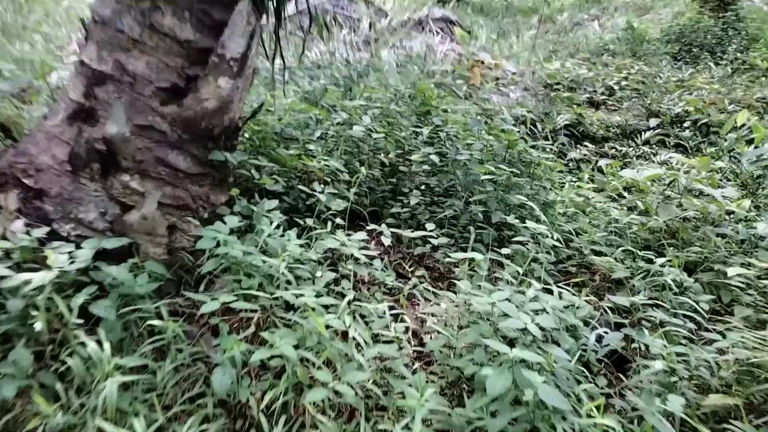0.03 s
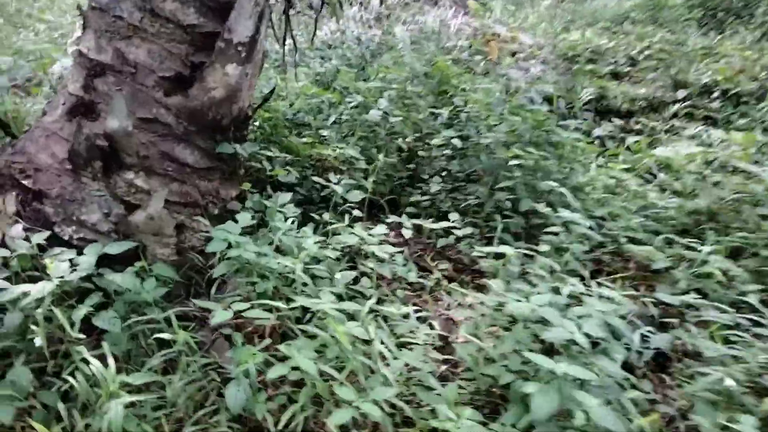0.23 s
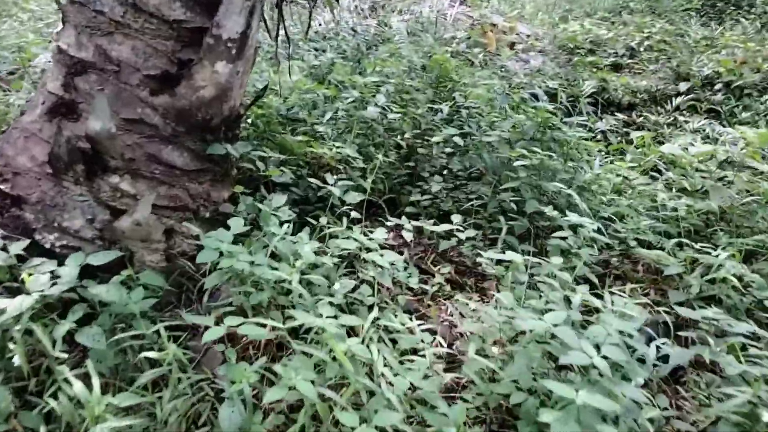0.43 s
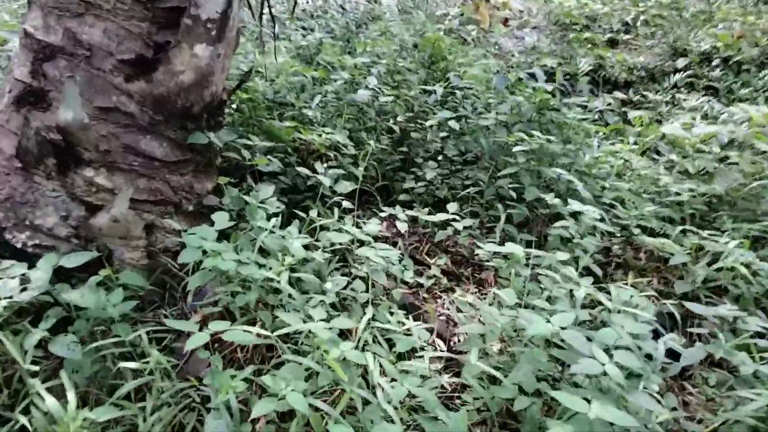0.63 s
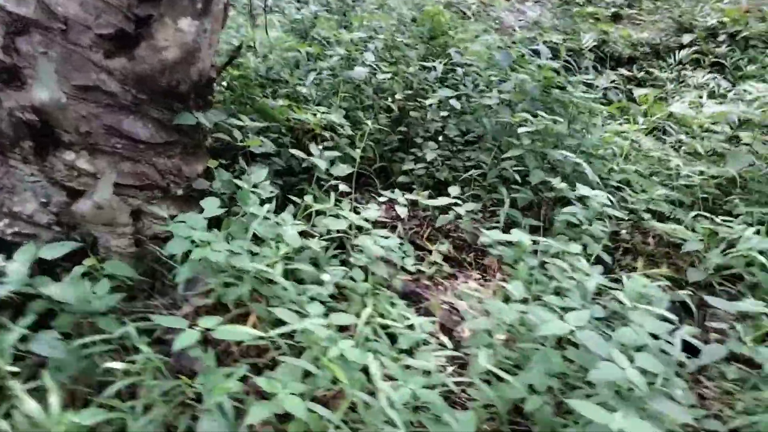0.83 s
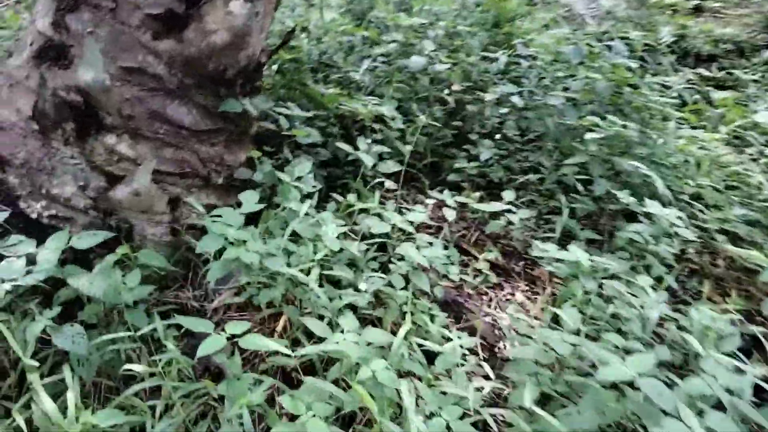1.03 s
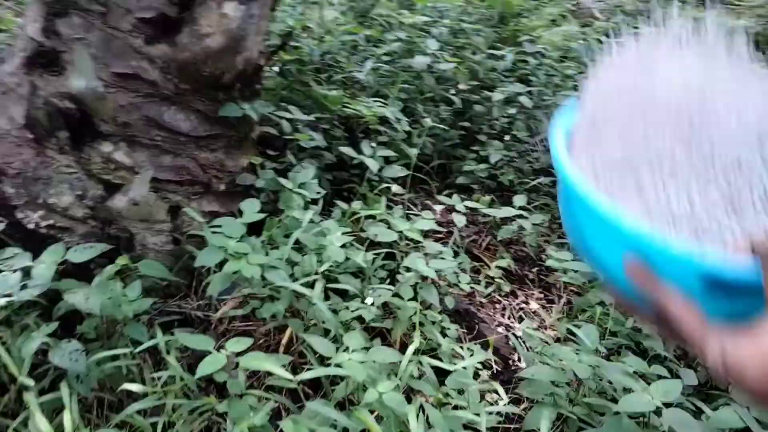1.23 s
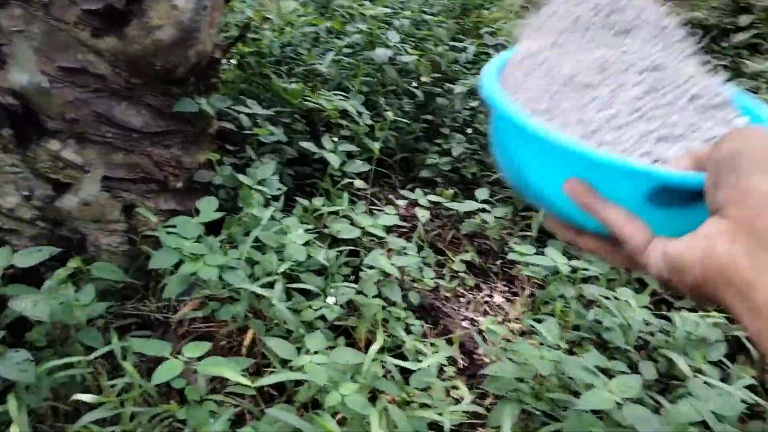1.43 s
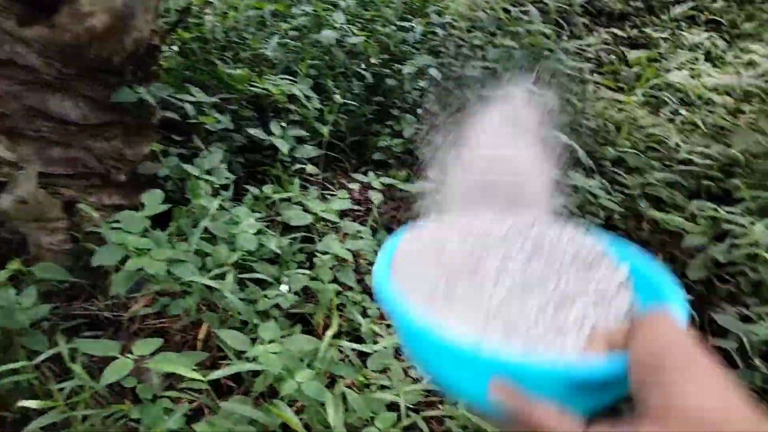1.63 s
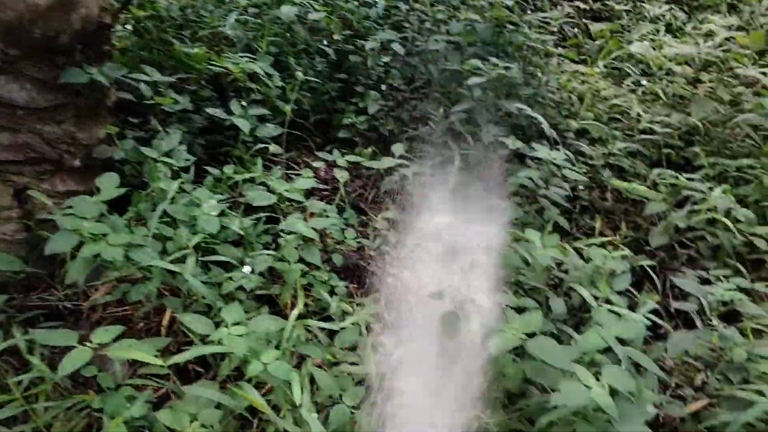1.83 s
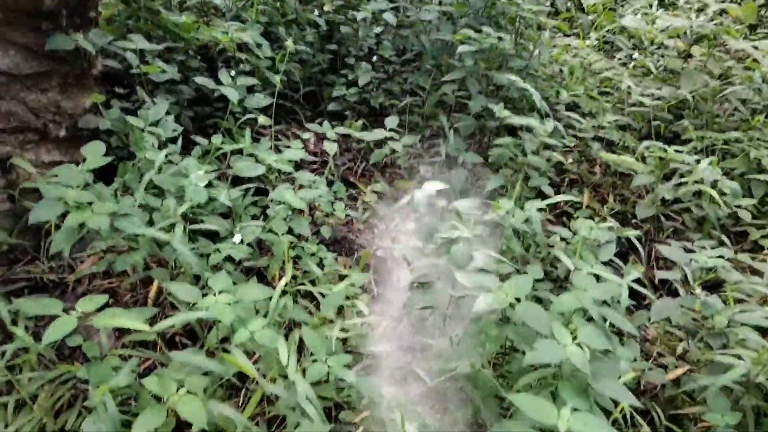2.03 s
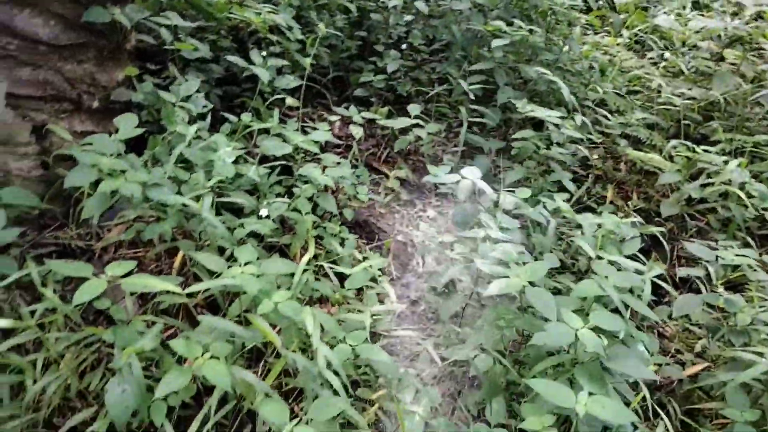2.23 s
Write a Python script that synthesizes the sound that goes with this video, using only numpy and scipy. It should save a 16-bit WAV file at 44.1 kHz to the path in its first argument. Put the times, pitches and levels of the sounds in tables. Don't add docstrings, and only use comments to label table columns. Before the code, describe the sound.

A spray of gritty grains hisses out of a plastic bowl onto leaves, after a short rattling jolt.

```python
import sys
import numpy as np
from scipy import signal
from scipy.fft import rfft, irfft, next_fast_len
from scipy.io import wavfile
from scipy.ndimage import uniform_filter1d, map_coordinates

SR = 44100
rng = np.random.default_rng(int(sys.argv[2]) if len(sys.argv) > 2 else 0)


def master(y):
    cut = np.clip(np.atleast_2d(y).T, -1, 1)
    pcm = np.round(cut * 32767)
    wavfile.write(sys.argv[1], SR, pcm.astype(np.int16))


def boost_factor(decibels):
    exponent = np.asarray(decibels, float) / 20
    return 10 ** exponent


N = 100018

# (time [s], stir level [dB], bowl resonance over it [dB])
SHIFT_MOVES = [(0.0, -42, -11.5), (0.044, -46, -10), (0.048, -50.5, -2), (0.064, -48.5, -12),
               (0.18, -57.5, -7.5), (0.25, -54, -4.5), (0.285, -52.5, -5), (0.31, -52, -1), (0.34, -53, -7),
               (0.506, -52.5, -13.5), (0.57, -48, -13), (0.59, -46, -8), (0.65, -45.5, -13.5),
               (0.784, -54, -8.5), (0.79, -55.5, -14), (0.988, -56.5, -8.5), (1.136, -62.5, -8),
               (1.16, -54, -8)]
# (frequency [Hz], density [dB per Hz])
SLIDE_COLOUR = [(1700, -25), (2800, -18.5), (4000, -21), (5000, -16.5), (6300, -15), (8800, -3),
                (11800, -16.5), (15500, -10.5)]
# (frequency [Hz], density [dB per Hz])
BOWL_COLOUR = [(300, -57), (600, -20), (900, -16.5), (1300, -10.5), (2000, -2), (2600, -13), (3300, -15),
               (5000, -27.5)]
# (centre [Hz], half width [Hz], level [dB])
INSECT_BANDS = [(4430, 223, -68.5), (5420, 460, -64), (6776, 610, -59)]
# (frequency [Hz], density [dB per Hz])
AIR_COLOUR = [(300, -14.5), (600, -10), (1900, -10.5), (3100, -13.5), (3700, -1.5), (8000, -0.5),
              (11400, -7.5), (14500, 2)]
# (frequency [Hz], density [dB per Hz])
RUMBLE_COLOUR = [(12, -17), (20, -1.5), (53, 5), (97, -5.5), (263, -14.5), (600, -17.5), (780, -37),
                 (1320, -120)]
# (time [s], peak [dB], bowl ring over it [dB], crack decay [ms per 30 dB], crack pitch [Hz])
LONE_TICKS = [(.0485, -29, -25, 14, 8400), (.0500, -28, -23, 11, 8900), (.0515, -26.5, -10, 3, 8000),
              (.1068, -25.5, -30, 4, 8000), (.1325, -38, -22, 4, 7000), (.1455, -34, -23, 4, 7500),
              (.527, -34, -20, 4, 10500), (.596, -32, -22, 4, 9000), (.779, -33.5, -20, 4, 9000),
              (.85, -41, -25, 4, 9000), (.977, -44.5, -0.5, 4.2, 3430), (.982, -46, -3, 5.4, 3420),
              (.98, -41, -27, 5, 9000), (1.014, -40, -23, 4, 9000), (1.016, -51, -10, 5, 3300),
              (1.044, -40.5, -15, 4, 9000), (1.0665, -37, -15, 4.8, 8500), (1.468, -49, -3, 6, 8500),
              (1.504, -51, -1, 4.4, 3970), (1.923, -22, -27, 3, 9000), (2.081, -30, -30, 4, 9000),
              (2.151, -30.5, -28, 4.8, 9000), (2.2125, -32, -28, 3, 9000), (2.2385, -34, -20, 4, 8500)]
# (time [s], peak [dB], bowl ring over it [dB], crack decay [ms per 30 dB],
# crack pitch [Hz])
JOLT_KNOCKS = [(1.155, -41, -8, 2, 5500), (1.1603, -31, -16, 4, 10000), (1.1685, -26, -6, 2.5, 5000),
               (1.1722, -28, -4, 3.5, 4500), (1.1826, -22, -20, 2, 5000), (1.1855, -23, -20, 2.5, 4500),
               (1.188, -20, -15, 1.5, 7500), (1.1897, -23, -20, 2.5, 4200), (1.191, -27, -20, 2, 5500),
               (1.1925, -20, -20, 2.5, 6500), (1.1948, -21.5, -16, 2.5, 6000), (1.1962, -22.5, -8, 2, 4500),
               (1.198, -23, -6, 3, 9000), (1.2068, -30, -6, 3, 6500), (1.2085, -29, 2, 4, 6500),
               (1.2103, -28, 4, 4, 7000), (1.217, -32, 1, 3, 4500), (1.2188, -32, 1, 3, 9000),
               (1.2285, -37, 3, 3, 6000), (1.234, -29, -10, 5, 9800), (1.2537, -38, -6, 3, 6500)]
# (time [s], rate [slips per s], level [dB])
CREAK_RUN = [
    (1.48, 200.5, -84),
    (1.56, 200.7, -74),
    (1.6, 200.7, -73),
    (1.63, 200.7, -68),
    (1.672, 200.8, -68),
]
# (time [s], peak [dB])
HAND_SLIPS = [(0.874, -56.5), (0.907, -61), (1.031, -61), (1.052, -56.5), (1.081, -61), (1.666, -56),
              (1.692, -57), (1.726, -57), (1.772, -60)]
# (time [s], force level [dB], rattle over it [dB])
JOLT_FORCE = [(1.148, -68, 8), (1.18, -47.5, 5), (1.185, -49.5, 1), (1.198, -43, 1), (1.211, -39, 0.5),
              (1.235, -46.5, 2), (1.255, -53.5, 1.5), (1.3, -59.5, 3), (1.38, -70, 0), (1.41, -73, 2),
              (1.55, -74, -10)]
# (frequency [Hz], density [dB per Hz])
RATTLE_COLOUR = [(2000, -29), (3200, -10), (4700, -1), (6300, -8), (9000, -2.5), (11500, -13), (15500, -21)]
# (frequency [Hz], density [dB per Hz])
WALL_COLOUR = [(400, -44), (900, -14), (1300, -13.5), (1750, -5.5), (2100, -1.5), (2450, -14.5),
               (3000, -24), (5000, -33)]
# (time [s], flow level [dB], heavy share over it [dB])
THROW_FLOW = [(1.746, -77, -2), (1.757, -56, -2.5), (1.8, -43.5, -6), (1.854, -36.5, -9.5),
              (1.876, -30, -8), (1.9, -28.5, -9.5), (1.925, -28.5, -13), (1.97, -33, -13),
              (2.1, -45, -12.5), (2.19, -46.5, -11.5), (2.268, -50.5, -11.5)]
# (frequency [Hz], density [dB per Hz])
SPRAY_COLOUR = [(3500, -39), (5000, -23.5), (7000, -7.5), (9300, -1), (11300, -9), (13000, -5.5),
                (15500, -4.5)]
# (frequency [Hz], density [dB per Hz])
HEAVY_COLOUR = [(120, -27), (250, -24.5), (750, -13.5), (1050, -15), (2100, -4), (3300, -11), (4000, -4),
                (7000, -6), (10000, -26)]
# (frequency [Hz], density [dB per Hz])
SCOOP_COLOUR = [(60, -20), (220, -7), (400, -4), (750, 1), (1500, -6), (3000, -38)]
# (from [Hz], to [Hz], under level [dB], rarity [field rms])
DROPOUT_BANDS = [(3800, 4150, -60, .1), (2500, 2850, -67, .8), (2980, 3250, -65, .1),
                 (11000, 11900, -57, .6)]


def unit(x):
    return x / np.sqrt(np.mean(x ** 2) + 1e-20)


def peak_one(x):
    return x / abs(x).max()


def along(points, hz):
    f, v = np.transpose(points)
    return np.interp(np.log(hz + 1), np.log(f + 1), v)


def curves(rows):
    s, db, other = np.transpose(rows)
    t = np.arange(N) / SR
    return np.interp(t, s, db, left=-140, right=-140), np.interp(t, s, other)


def wobble(rate):
    knots = rng.standard_normal(int(N * rate / SR) + 4)
    return map_coordinates(knots, [np.arange(N) * rate / SR])


def patches(shape, size):
    field = uniform_filter1d(rng.standard_normal(shape), size=3, axis=0)
    return unit(uniform_filter1d(field, size=size, axis=1))


def coloured(x, spectrum):
    m = 2 * next_fast_len(N // 2 + 4096)
    gain = boost_factor(along(spectrum, np.fft.rfftfreq(m, 1 / SR)))
    cepstrum = irfft(np.log(gain + 1e-6), m)
    cepstrum[1:m // 2] *= 2
    cepstrum[m // 2 + 1:] = 0
    return unit(irfft(rfft(x, m) * np.exp(rfft(cepstrum)), m)[:N])


def patter(spectrum, count, scatter_db, smooth, clump_db):
    when, strength, sign = rng.random((count, 3)).T
    size = boost_factor(-scatter_db * np.log(1 - strength)) * np.sign(sign - 0.5)
    hits = unit(np.bincount((when * N).astype(int), size, N))
    hits = hits + smooth * rng.standard_normal(N)
    clumps = boost_factor(clump_db * (wobble(44.1) + wobble(160)))
    z = signal.stft(hits * clumps, nperseg=64)[2]
    z = z * boost_factor(1.1 * patches(z.shape, 3))
    return coloured(signal.istft(z, nperseg=64)[1][:N], spectrum)


def swell(start_s, attack_s, db, t60_s):
    t = np.clip(np.arange(N) / SR - start_s, 0, None)
    return (1 - np.exp(-t / attack_s)) * boost_factor(db - 60 * t / t60_s)


def shifting():
    stir_db, bowl_db = curves(SHIFT_MOVES)
    slide = boost_factor(5.0) * patter(SLIDE_COLOUR, count=16000, scatter_db=1.5, smooth=1.66, clump_db=0.78)
    bowl = patter(BOWL_COLOUR, count=5000, scatter_db=3.0, smooth=0.74, clump_db=0.5)
    return boost_factor(stir_db) * (slide + boost_factor(bowl_db - 2.0) * bowl)


def insects():
    hz = np.fft.rfftfreq(N, 1 / SR)
    song = np.zeros(N)
    for centre, half_width, db in INSECT_BANDS:
        band = np.exp(-abs((hz - centre) / half_width) ** 3)
        voice = unit(irfft(rfft(rng.standard_normal(N)) * band, N))
        song += boost_factor(db + 0.38 * wobble(4.1) + 1.9 * wobble(40.0)) * voice
    return song


def open_air():
    air = boost_factor(-55.5 + 1.6 * wobble(0.87)) * coloured(rng.standard_normal(N), AIR_COLOUR)
    rumble = boost_factor(-70.5 + 1.8 * wobble(2.96)) * coloured(rng.standard_normal(N), RUMBLE_COLOUR)
    return air + rumble


def bandpass(lo, hi, x):
    return signal.lfilter(*signal.butter(2, [lo, hi], "band", fs=SR), x)


def granule_clicks():
    out, t = np.zeros(N + SR), np.arange(SR // 25) / SR
    spread = 1.22
    ring_hz, ring_t60_s = 1980, 0.007
    # rows, snap over crack, half width of the bowl ring [Hz]
    for rows, sharp, half_hz in ((LONE_TICKS, 0.1, 975), (JOLT_KNOCKS, 1.5, 276.25)):
        for s, db, bowl_db, decay_ms, hz in rows:
            grit = rng.standard_normal((3, len(t)))
            burst = grit[0] * boost_factor(-30000 * t / (decay_ms + 0.5))
            crack = peak_one(bandpass(hz / spread, hz * spread, burst))
            snap = peak_one(bandpass(3500, 8800, grit[1] * boost_factor(-60 * t / 0.001)))
            body = grit[2] * boost_factor(-60 * t / ring_t60_s)
            ring = peak_one(bandpass(ring_hz - half_hz, ring_hz + half_hz, body))
            click = peak_one(crack + sharp * snap) + boost_factor(bowl_db) * ring
            out[round(s * SR):][:len(t)] += boost_factor(db) * click
    return signal.lfilter(*signal.butter(3, 800, "high", fs=SR), out[:N])


def side_fizz():
    when_s, width_s, db = 0.05, 0.0055, -38.5
    fizz = coloured(rng.standard_normal(N), [(3500, -62), (4500, -13), (8500, 10), (15000, -9)])
    return boost_factor(db) * np.exp(-((np.arange(N) / SR - when_s) / width_s) ** 2) * fizz


def hand_grip():
    s, rate, db = np.transpose(CREAK_RUN)
    t = np.arange(N) / SR
    slip_rate = np.interp(t, s, rate) * (1 + 0.0059 * wobble(29.7))
    turns = np.floor(np.cumsum(slip_rate) / SR)
    creak_db = np.interp(t, s, db, left=-140, right=-140) + 7.0 + 1.1 * wobble(60)
    pushes = np.diff(turns, prepend=0) * boost_factor(creak_db)
    for slip_s, peak_db in HAND_SLIPS:
        pushes[round(slip_s * SR)] += boost_factor(peak_db)
    u = np.arange(-200, 200) / SR / 0.00087
    push = np.exp(-u ** 2) + 0.14 * np.exp(-(4.3 * u) ** 2)
    recoil = 0.5 * np.exp(-((u + 2.0) / 0.56) ** 2)
    return np.convolve(pushes, push - recoil, "same")


def jolt():
    force_db, rattle_db = curves(JOLT_FORCE)
    rattle = patter(RATTLE_COLOUR, count=14000, scatter_db=2.2, smooth=1.1, clump_db=0.8)
    wall = patter(WALL_COLOUR, count=12000, scatter_db=2.0, smooth=1.2, clump_db=0.5)
    return boost_factor(force_db) * (boost_factor(rattle_db) * rattle + wall)


def settling():
    hz = np.fft.rfftfreq(N, 1 / SR)
    wide_hz = 90
    modes = sum(1 / (1 + ((hz - centre) / wide_hz) ** 2) for centre in (1780, 2100))
    ring = unit(irfft(rfft(rng.standard_normal(N)) * modes, N))
    return swell(start_s=1.25, attack_s=0.037, db=-54.5, t60_s=0.5) * ring


def throw():
    flow_db, heavy_db = curves(THROW_FLOW)
    spray = boost_factor(1.88) * patter(SPRAY_COLOUR, count=20000, scatter_db=1.5, smooth=1.3, clump_db=-0.05)
    heavy = patter(HEAVY_COLOUR, count=12000, scatter_db=2, smooth=0.88, clump_db=-0.35)
    return boost_factor(flow_db) * (spray + boost_factor(heavy_db + 1.2) * heavy)


def scoop():
    scrape = patter(SCOOP_COLOUR, count=3000, scatter_db=1.0, smooth=0.96, clump_db=0.0)
    return swell(start_s=1.748, attack_s=0.021, db=-54.5, t60_s=0.85) * scrape


def scene():
    bowl = shifting() + granule_clicks() + jolt() + settling()
    thrown = throw() + scoop()
    mid = bowl + thrown + hand_grip() + insects() + open_air()
    side = side_fizz()
    return np.array([mid + side, mid - side])


def quiet_dropouts(x):
    hz, _, z = signal.stft(x, SR, nperseg=1024)
    field = patches(z.shape[1:], 11)
    for lo, hi, under_db, rarity in DROPOUT_BANDS:
        inside = (hz > lo) & (hz < hi)
        quiet = np.sqrt(np.sum(abs(z[0, inside]) ** 2, axis=0)) < boost_factor(under_db)
        hole = inside[:, None] & quiet & (field > rarity)
        z = z * np.where(hole, boost_factor(-25), 1)
    return signal.istft(z, SR, nperseg=1024)[1][:, :N]


def top_cut(x):
    return signal.sosfilt(signal.butter(12, 17100, fs=SR, output="sos"), x)


def record(dry):
    top_hz = 15830
    spectrum = rfft(quiet_dropouts(dry))
    mix = irfft(spectrum * (np.fft.rfftfreq(N, 1 / SR) < top_hz), N)
    return top_cut(mix)


dry = scene()
out = record(dry)
master(out)
```